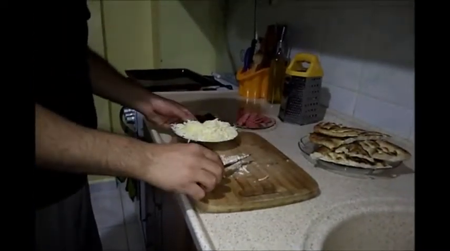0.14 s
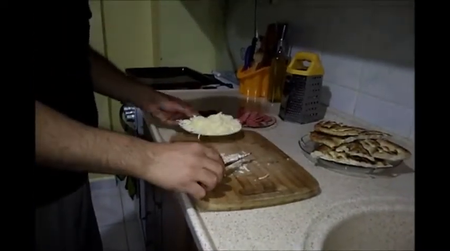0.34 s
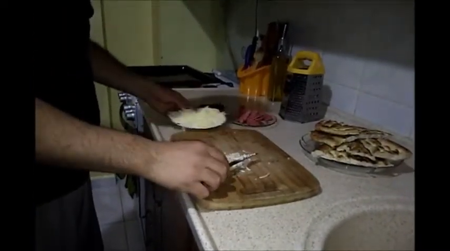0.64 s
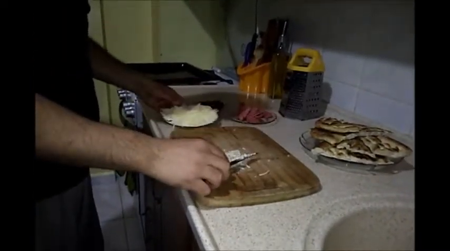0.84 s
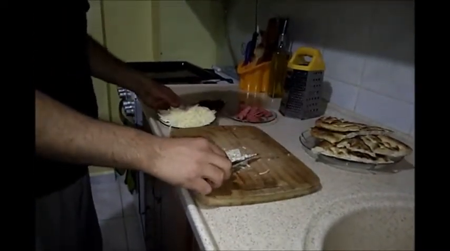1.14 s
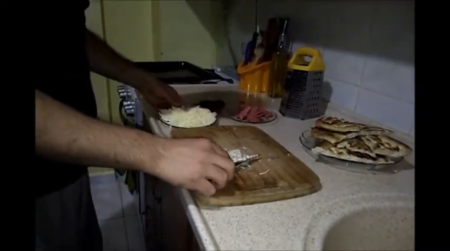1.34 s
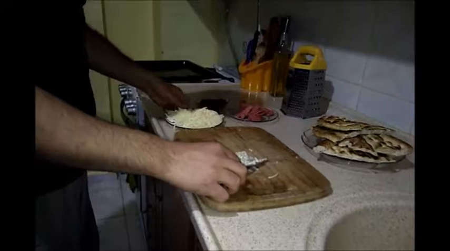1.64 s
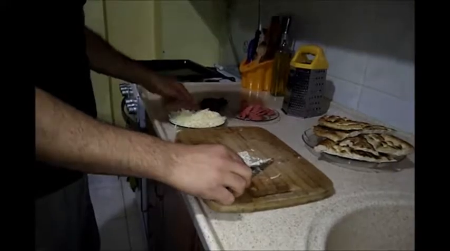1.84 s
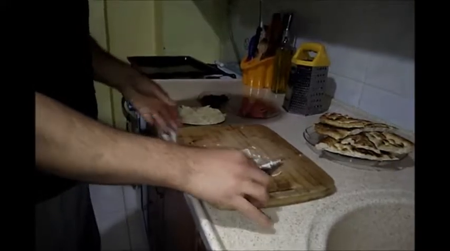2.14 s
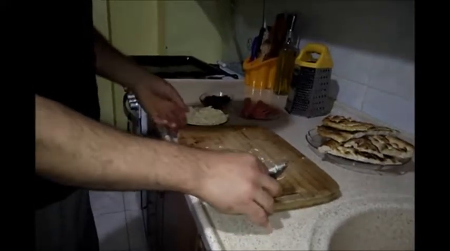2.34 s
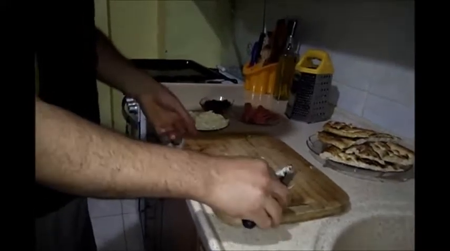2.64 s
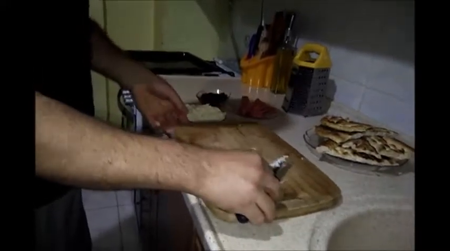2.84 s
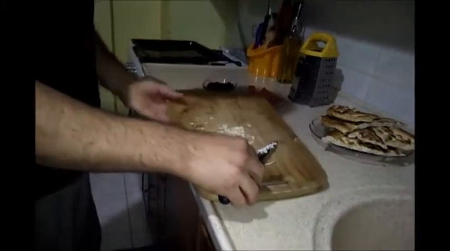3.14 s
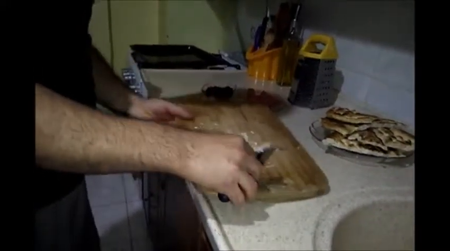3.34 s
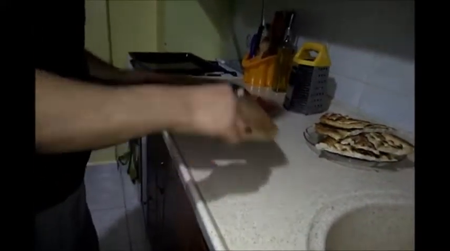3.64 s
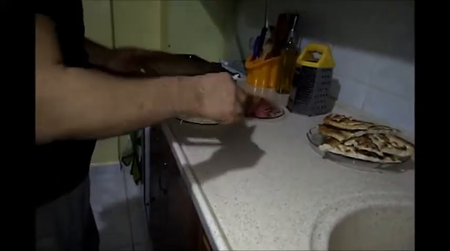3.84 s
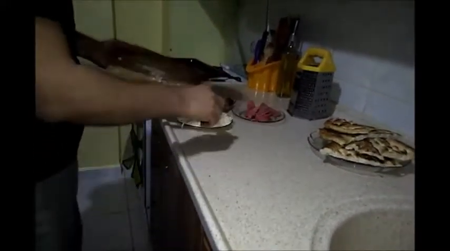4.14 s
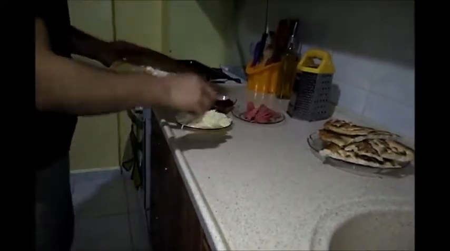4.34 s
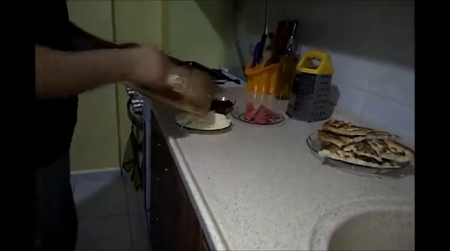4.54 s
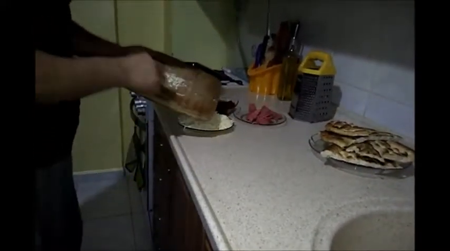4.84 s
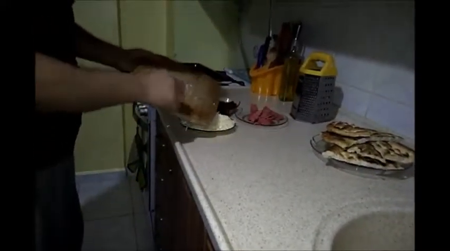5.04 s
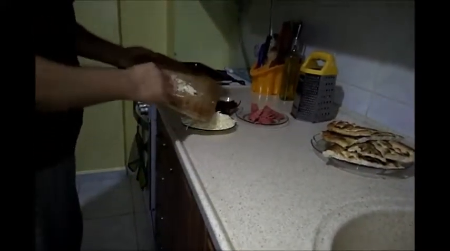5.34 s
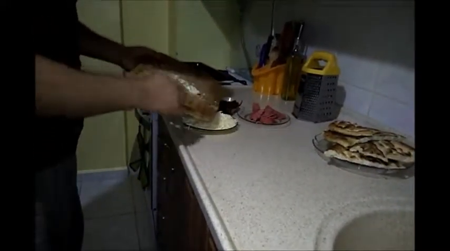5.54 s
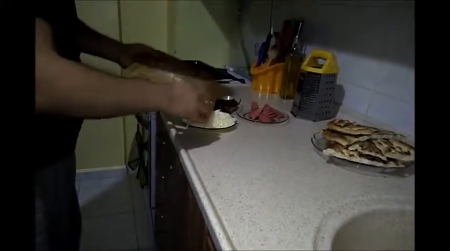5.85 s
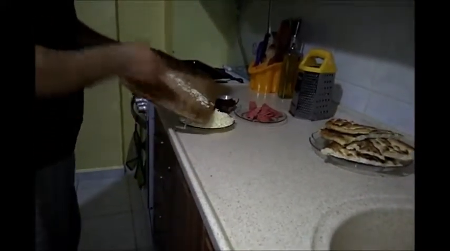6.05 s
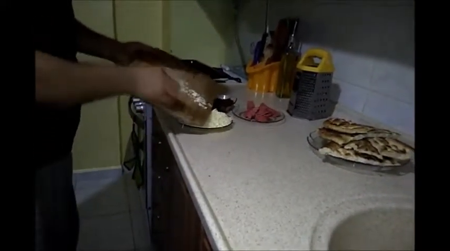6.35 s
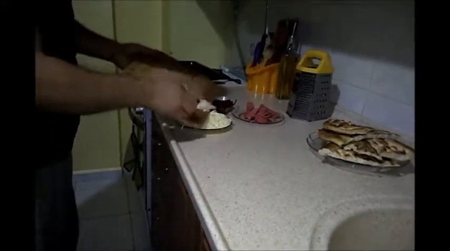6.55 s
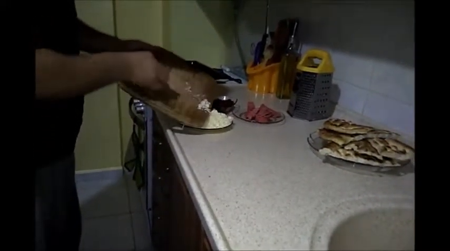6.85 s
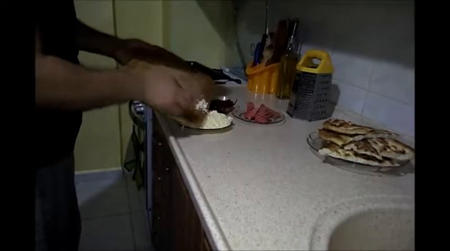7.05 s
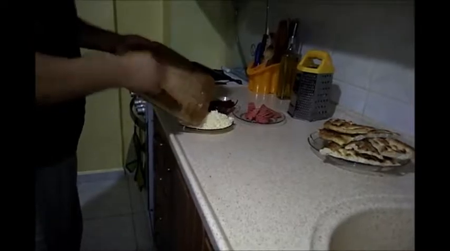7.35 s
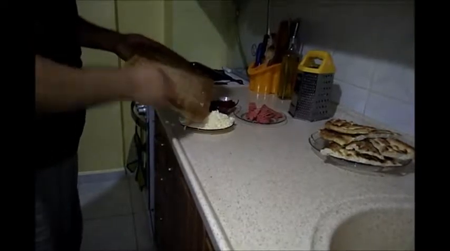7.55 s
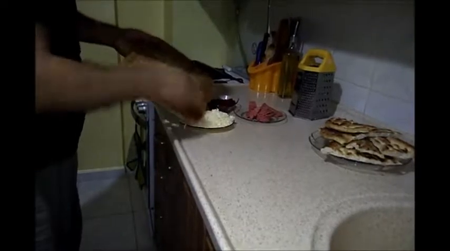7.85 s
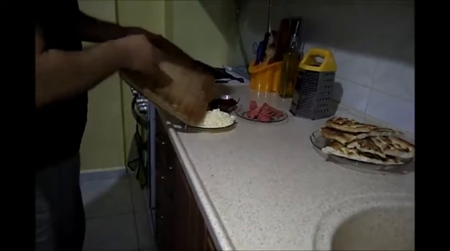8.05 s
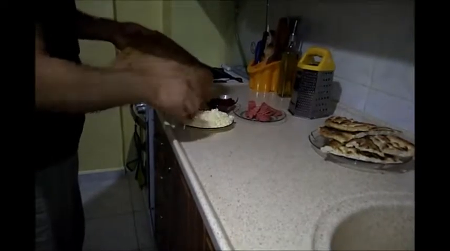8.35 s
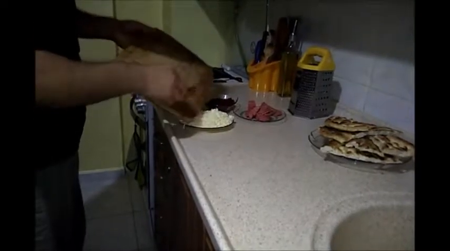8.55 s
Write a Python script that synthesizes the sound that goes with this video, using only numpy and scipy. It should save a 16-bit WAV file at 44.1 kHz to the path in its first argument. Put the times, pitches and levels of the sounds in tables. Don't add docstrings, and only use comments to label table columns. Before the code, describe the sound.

Dishes clink on a kitchen counter, a wooden board is slid and lifted, then a blade scrapes it in six rasping strokes and raps it.

```python
import sys
import numpy as np
from scipy import signal
from scipy.fft import rfft, irfft, next_fast_len
from scipy.io import wavfile
from scipy.ndimage import uniform_filter1d

SR = 44100
rng = np.random.default_rng(int(sys.argv[2]) if len(sys.argv) > 2 else 0)


def persist_wave(psi):
    counts = np.round(np.clip(psi, -1, 1) * 32767).astype(np.int16)
    wavfile.write(sys.argv[1], SR, np.atleast_2d(counts).T)


def ratio_of_db(decibels):
    return 10 ** (np.asarray(decibels, float) / 20)


N = 383792

# pitch_hz, level_db per hz
HISS_SPECTRUM = [(50, 5), (100, -0.5), (350, -1.5), (1000, -10), (3000, -9.5), (10050, -3.5),
                 (10400, -10.5), (11500, -32.5)]
# pitch_hz, likeness
HISS_LIKENESS = [(60, 0.21), (180, -0.061), (550, 0.36), (1650, 0.094), (4970, -0.28), (15000, -1.3)]
# pitch_hz, level_db
WHINE = [(5490, -79), (9335, -84), (9383, -68.5), (9432, -87)]
# peak_s, level_db, rise_s, fall_s, dull_part_db
RUSTLE = [(0.0, -62.5, .01, 0.56, -17), (.536, -64.5, 0.18, 0.52, 13), (1.336, -50, 0.0081, 0.065, -2),
          (1.55, -67, 0.063, 0.98, -1.5), (1.82, -68, 0.61, 0.041, 8.5), (2.36, -70, .01, 0.19, 2.5),
          (2.7, -66.5, 1.9, 0.73, -5.5), (3.284, -60, 0.46, 0.2, -16), (3.415, -48, 0.024, 0.18, -23),
          (3.49, -49, 0.15, 0.18, -18), (3.9, -65.5, 1.4, 0.83, -10), (4.53, -57.5, 0.15, 0.035, -5.5),
          (4.75, -70.5, 0.11, 0.27, -23), (5.363, -62.5, 0.29, 0.2, -12), (5.43, -55, .015, 0.024, 5.5),
          (6.25, -86, 0.11, .03, -31)]
# pitch_hz, level_db per hz
CLOTH = [(1500, -24.5), (2800, -5), (4400, -5), (7800, -2.5), (10500, -15.5), (13000, -18.5), (13800, -43)]
# peak_s, level_db, rise_s, fall_s
RUMBLE = [(.53, -59, 0.059, 0.42), (.85, -52.5, 0.083, 0.1), (1.14, -55, 0.14, 0.15), (1.7, -63, 1.3, 0.55),
          (1.87, -37.5, .03, 0.13), (2.3, -60, 0.34, .12), (2.83, -58, 0.42, 0.29),
          (3.05, -52, 0.026, 0.23), (3.22, -57, 0.17, 0.11), (3.75, -52, 0.075, 0.1),
          (5.47, -51, 0.13, 0.066), (5.84, -53, .08, .04), (5.94, -62, 0.057, 0.41), (8.29, -67, 0.28, .4),
          (8.62, -64, .08, .3)]
# pitch_hz, width_hz, level_db
CUPBOARD_MODES = [(70.0, 38, 0)]
# peak_s, level_db, rise_s, fall_s
DRAGS = [
    (.36, -61, 0.1, 0.2),
    (.51, -43, 0.15, 0.11),
    (.73, -52.5, 0.0059, 0.062),
    (1.17, -49.5, 0.066, 0.076),
    (1.6, -70.5, 1.3, 1.9),
    (1.83, -68, 0.031, 0.023),
    (3.05, -61, 0.046, 0.36),
    (3.41, -60, 0.019, 0.27),
    (4.53, -70, 0.077, 0.38),
]
# pitch_hz, level_db per hz
COUNTER = [(100, -8), (200, -16.5), (450, -5), (900, -18), (1450, -15.5), (2200, -24.5), (4000, -44),
           (6000, -95)]
# peak_s, level_db, rise_s, fall_s
CHAFE = [
    (.47, -52.5, 0.11, 0.14),
    (2.96, -67, 0.15, 0.13),
    (3.14, -66.5, 0.09, 0.18),
]
# pitch_hz, width_hz, level_db
CHAFE_MODES = [(870, 330, 0), (1367, 64, 10)]
# start_s, peak_db, brightness_db, depth_db
KNOCKS = [(0.516, -22.5, -5, -58), (0.611, -29, -4.5, -28), (0.728, -31.5, -9.5, -24.5),
          (3.03, -49.5, -2.5, -3), (3.108, -43.5, -11, -4), (3.214, -42, -25, -3), (3.338, -34, -17, -14),
          (3.344, -26, -18, -26), (3.355, -31, -15, -20), (3.548, -46.5, -37, 0), (3.74, -64, -18, 8),
          (3.762, -54.5, -18, 1), (5.475, -51, -18, -10), (5.817, -44, -15, -9), (5.938, -58.5, -27, 9)]
# pitch_hz, level_db, t60_s
WOOD = [(174, -4.5, 0.58), (349, -3, 0.3), (481.5, 2, 0.22), (600.5, 9.5, 0.32), (760, -60, 0.0099),
        (1080, -23, 0.025), (1776, -7, 0.16), (1880, -18, 0.036)]
# start_s, peak_db, ring_against_crack_db
CLINKS = [
    (0.836, -11.5, 0),
    (1.0695, -14, -0.5),
    (1.4207, -28, 5),
    (1.8383, -6.5, 6.5),
    (8.6065, -3.5, -1.5),
]
# pitch_hz, level_db per hz
CRACKS = [
    [(52, -54), (88, -13.5), (1670, -14.5), (3260, -7), (7870, -8), (9200, -24), (12900, -48), (15000, -70)],
    [(52, -46), (88, -18.5), (1320, -2), (5580, -9), (6080, -7), (8900, -16.5), (12400, -38), (15000, -95)],
    [(52, -36.5), (88, -1), (3120, -6), (4900, 0), (8760, -3.5), (12900, -21), (15000, -74)],
    [(35, -43.5), (90, -19), (650, -15.5), (1300, -12), (3500, -7.5), (7900, -15), (9000, -33),
     (12500, -55), (16000, -60)],
    [(35, -64), (150, -40), (1790, -7), (2470, -9.5), (3420, -1), (8230, -20.5), (12800, -35.5),
     (15000, -69.5)],
]
# pitch_hz, level_db, t60_s
GLASS = [(2155, 1, .16), (2206, 3, .16), (3055, -7, .12), (3522, 3, .17), (3640, -5, .1), (8100, -6, .12),
         (5240, 4, .16), (7477, 1, .14), (7593, 5, .15), (9930, -5, .09), (10200, -5, .08),
         (11500, -10, .11), (14000, -24, .035), (15430, 4, .04)]
# pitch_hz, level_db, t60_s
RAP = [(303, -20.5, 0.12), (575, 1, 0.18), (784, -22, 0.16), (1200, -5.5, 0.086), (1776, 10, 0.073),
       (2400, -4, .16), (3050, 2, .07), (3365, 9, 0.1), (4435, 5, .12), (4670, 2, 0.12), (4870, 8, .12),
       (5300, 2, .14), (6760, -2, 0.08), (7960, 6, 0.07)]
# pitch_hz, level_db, t60_s
RINGS = [
    [(448, -9, .1), (2830, -8, .06), (3194, -3, .08), (3324, 6, .16), (3958, -10, .08), (4680, -3, .08),
     (5175, 4, .12), (5500, -2, .08), (6690, 0, .09), (6960, -3, .08), (8600, 9, .08), (9980, -5, .07),
     (10700, -4, .07), (12500, -4, .08)],
    [(396, -13, .09), (1127, -1, .12), (2206, -3, .12), (1440, -4, .12), (4737, -4, .14), (5270, -4, .16),
     (6004, 9, .07), (6272, 5, .17), (7480, -5, .13), (8300, 4, .11), (9910, -9, .07), (12000, -14, .07)],
    [(3280, -14.5, 0.15), (3840, -13.5, 0.18), (5000, -3, .15), (6650, -5, .15), (8550, 4.5, 0.044)],
    GLASS,
    RAP,
]
# delay_s, level_db
BOUNCES = [
    [(.004, 1.5), (.009, -1.5), (.015, -3.5)],
    [(.004, 2), (.009, 0), (.016, 0)],
    [(.006, -3.5)],
    [(.003, 1), (.006, 3), (.0105, -1), (.031, -7)],
    [(.001, 1.5), (.005, 1), (.011, -2), (.015, -4)],
]
SPLITS = [.006, .004, .015, .004, .012]
# start_s, peak_db, brightness_db
LANDINGS = [
    (4.82, -43.5, 13),
    (5.82, -50.5, -10),
    (6.2775, -43, -14),
    (6.9164, -53, -10),
    (7.571, -40.5, -8),
    (7.621, -38.5, -2),
    (8.108, -38, -7),
]
# middle_s, level_db, half_length_s, pitch_hz, width_hz
CATCHES = [(4.87, -63, .07, 3000, 120), (4.88, -66.5, .08, 345, 73), (5.02, -60, .06, 2300, 120),
           (5.22, -61, .035, 1260, 30), (5.62, -63, .05, 460, 120), (5.69, -61, .06, 490, 150),
           (5.97, -66, .05, 590, 20), (5.64, -62, .06, 1700, 210), (5.91, -63.5, .04, 540, 30),
           (6.419, -51.5, 0.044, 600, 32), (6.49, -62, 0.028, 640, 30), (6.573, -59, 0.019, 580, 30),
           (5.065, -47.5, .02, 604, 88), (8.261, -57.5, 0.048, 640, 120), (6.355, -55.5, .03, 2600, 200),
           (6.385, -56.5, .05, 1950, 120), (6.58, -66.5, .05, 1900, 200), (7.05, -59.5, .08, 1800, 90),
           (7.05, -65, .08, 1290, 60.6), (7.64, -52, 0.033, 1700, 200), (7.72, -53.5, .05, 3100, 200),
           (7.76, -58, .04, 2350, 150), (7.78, -56.5, .06, 1750, 120), (8.23, -52, .04, 1270, 79.5),
           (8.27, -49.5, .04, 3240, 250), (8.3, -54, .04, 2970, 250), (8.3, -55, .03, 2100, 300),
           (7.2, -60, .07, 1860, 60), (7.12, -60, .08, 2320, 200), (3.1, -65, .12, 2700, 1200),
           (3.355, -46, 0.015, 600, 200), (1.6, -66, 0.08, 200, 80), (1.1, -52.5, .06, 170, 60)]
# start_s, peak_db, centre_hz, t60_s
TICKS = [(1.3286, -38.5, 7200, 0.021), (1.834, -33, 2500, 0.051), (2.3545, -39, 7100, 0.024),
         (3.216, -45, 6000, 0.031), (4.6324, -39, 6200, 0.019), (4.8198, -39, 2400, 0.072),
         (5.4215, -46, 5400, 0.037), (5.454, -42, 5630, 0.02), (5.439, -50, 1200, 0.037),
         (5.484, -56, 1380, 0.016), (5.8197, -39, 7460, 0.025), (6.1784, -44, 7920, 0.018),
         (6.215, -40.5, 8860, 0.014), (6.233, -45.5, 8620, 0.018), (6.2775, -31, 5950, 0.04),
         (6.7516, -45, 2380, 0.015), (6.769, -51, 4400, 0.029), (6.9176, -46, 2670, 0.034),
         (7.571, -40.5, 4610, 0.035), (8.1084, -39.5, 2360, 0.057)]
# start_s, peak_db, pitch_hz, t60_s
BUMPS = [(3.04, -46, 60.7, .12), (3.116, -49, 91, 0.068), (3.17, -43, 58.7, 0.53), (3.207, -44.5, 59, 0.44),
         (3.24, -46, 58.4, 0.21), (3.061, -43, 60, 0.12), (3.692, -57, 70, 0.058),
         (3.741, -46.5, 85, 0.056), (3.762, -47.5, 75, 0.14), (5.377, -53.5, 60, .12),
         (5.419, -54, 75, 0.07), (5.463, -50, 70, .14), (5.818, -39.5, 132, 0.027), (5.845, -50, 60, .08),
         (5.936, -53, 75, 0.1), (6.031, -52.5, 61.6, 0.098), (6.1, -58, 60, 0.097)]
# time_s, speed_db
SPEED = [
    [(4.815, -65), (4.899, -51), (5.185, -52.5), (5.235, -75), (5.33, -76)],
    [(5.53, -72), (5.612, -57.5), (5.834, -72.5), (5.86, -85)],
    [(6.272, -53), (6.285, -55.5), (6.428, -57), (6.602, -62.5), (6.652, -92)],
    [(6.912, -64), (6.962, -50), (7.098, -50.5), (7.25, -69.5), (7.3, -82)],
    [(7.567, -56), (7.621, -54.5), (7.693, -46), (7.789, -46.5), (7.9, -86)],
    [(8.106, -59), (8.188, -51.5), (8.22, -44), (8.316, -43.5), (8.45, -74)],
]
# lift_s, low_modes_db, landing_db, mid_against_hiss_db, high_against_hiss_db
PRESS = [
    (5.17, -42, -14.5, -7, -4.5),
    (5.77, -53, -13, 1, 3),
    (6.55, -42, 0, -28.5, -3),
    (7.15, -46.5, 0, -18, -3),
    (7.76, -49, -4, -10, -2),
    (8.33, -50, -3, -24, -7.5),
]
# pitch_hz, level_db per hz
EDGE = [(150, -22), (400, -2.5), (2000, -7), (3000, 7.5), (4500, 3), (8900, 2.5), (12500, -13.5),
        (14000, -50)]
# pitch_hz, width_hz, level_db
BOARD_LOW = [(551.2, 27.7, -1.5), (575, 27, 4), (635, 48, -6.5), (517.5, 9.3, -14.5), (776, 52, -16.5),
             (370, 30, -26)]
# pitch_hz, width_hz, level_db
BOARD_MID = [(1254, 39, -8), (1285, 71, -12), (1103, 68, -23.5)]
# pitch_hz, width_hz, level_db
BOARD_HIGH = [(1646, 87, 6), (1805, 56, 12), (2035, 63, 3.5), (2460, 42, 7.5), (2670, 86, -2.5),
              (2920, 110, 20), (3490, 50, -4)]
# pitch_hz, t60_s
ROOM = [(100, 0.65), (500, .36), (2000, 0.3), (5000, 0.33), (10000, 0.26), (15000, 0.085)]
# pitch_hz, likeness
ROOM_LIKENESS = [(100, 0.8), (700, 0.75), (2000, 0.18), (10000, 0.51)]
# pitch_hz, left_minus_right_db
PORT_DB = [(60, -2.5), (180, -4), (550, -0.5), (1650, 1), (4970, -9), (15000, -3.5)]
# pitch_hz, level_db
MIC = [(30, -18.5), (80, -1.5), (9000, -2), (12000, 3.5), (14000, -1.5), (16000, -15.5)]


def evened(x):
    return x / np.sqrt(np.mean(x ** 2) + 1e-20)


def read(points, hz):
    f, value = np.transpose(points)
    return np.interp(np.log(hz + 1), np.log(f + 1), value)


def add(mix, s, sound):
    part = mix[round(s * SR):][:len(sound)]
    part += sound[:len(part)]


def colour(x, points):
    size = next_fast_len(x.shape[-1], real=True)
    gain = ratio_of_db(read(points, np.fft.rfftfreq(size, 1 / SR)))
    return irfft(rfft(x, size) * gain, size)[..., :x.shape[-1]]


def swells(rows):
    t = np.arange(0, N, 16) / SR
    power = 0
    for s, db, rise, fall in rows:
        away = np.maximum((s - t) / rise, (t - s) / fall)
        power = power + ratio_of_db(db - 20 * away) ** 2
    return np.interp(np.arange(N) / SR, t, np.sqrt(power))


def grit(per_s, spread_db, smooth):
    slips = (rng.random(N) < per_s / SR) * ratio_of_db(spread_db * np.minimum(rng.exponential(1, N), 4))
    return (smooth + evened(slips)) * rng.standard_normal(N)


def resonate(x, peaks, wander_db=0.):
    out, steps = 0, np.arange(0, N, SR // 22)
    for k, (hz, width, db) in enumerate(peaks):
        r = np.exp(-np.pi * width / SR)
        mode = signal.lfilter([1, 0, -r], [1, -2 * r * np.cos(2 * np.pi * hz / SR), r * r], x)
        swell = np.interp(np.arange(N), steps, ratio_of_db(db + wander_db * rng.standard_normal(len(steps))))
        out = out + (-1) ** k * (1 - r) * swell * mode
    return evened(out)


def ringing(modes, longest_s, tilt_db=0., split=0.028, count=4, scatter=0.93):
    t, x = np.arange(SR // 4) / SR, 0
    for hz, db, t60 in modes:
        fade = ratio_of_db(db + tilt_db * (hz > 1000) - 60 * t / min(t60, longest_s))
        jitter, phase = rng.uniform(-0.97, 1, (2, count, 1))
        detune = np.linspace(-1, 1, count)[:, None] + jitter / count
        cluster = np.sin(2 * np.pi * (hz * (1 + split * detune) * t + scatter * phase))
        x = x + fade * cluster.sum(0)
    return x / abs(x).max()


def burst(points, t60, rise_s):
    t = np.arange(SR // 4) / SR
    noise = evened(colour(rng.standard_normal(len(t)), points))
    return noise * ratio_of_db(-60 * t / t60) * np.minimum(t / rise_s, 1)


def sagging(hz):
    return np.sin(2 * np.pi * np.cumsum(hz) / SR)


def pair(same, frames, size):
    a, b, c, d = rng.standard_normal((frames, size // 2 + 1, 4)).T
    like = np.clip(read(same, np.fft.rfftfreq(size, 1 / SR)), -1, 1)[:, None]
    left, other = a + 1j * b, c + 1j * d
    return np.array([left, like * left + np.sqrt(1 - like ** 2) * other])


def floor():
    z = pair(HISS_LIKENESS, N // 256 + 5, size=1024)
    noise = signal.istft(z, nperseg=1024, noverlap=768)[1][:, :N]
    hush = ratio_of_db(-62) * evened(colour(noise, HISS_SPECTRUM))
    t = np.arange(N) / SR
    whine = sum(np.sqrt(2) * ratio_of_db(db) * np.sin(2 * np.pi * hz * t) for hz, db in WHINE)
    return hush + whine * ratio_of_db([[0.3], [-0.3]])


def rustle():
    fizz = swells([row[:-1] for row in RUSTLE])
    dull = swells([(s, db + dull_db, rise, fall) for s, db, rise, fall, dull_db in RUSTLE])
    rub = grit(4000, 1.2, smooth=1.0)
    low = colour(rub, [(300, -12.5), (600, -3.0), (1400, -5.5), (2200, -7.5), (3500, -37.5)])
    return fizz * evened(colour(rub, CLOTH)) + ratio_of_db(-7.0) * dull * evened(low)


def rumble():
    push = rng.standard_normal(N) + 0.62 * rng.standard_normal((2, N))
    shake = colour(push, [(25, -13.0), (45, -0.5), (130, -10.5), (250, -20.5)])
    level = np.hypot(swells(RUMBLE), ratio_of_db(-72))
    return level * resonate(shake, CUPBOARD_MODES) * ratio_of_db([[-1.2], [1.2]])


def drags():
    stutter = grit(800, 3, smooth=.7)
    slide = swells(DRAGS) * evened(colour(stutter, COUNTER))
    return slide + swells(CHAFE) * resonate(stutter, CHAFE_MODES)


def knocks():
    out, t = np.zeros(N), np.arange(SR // 5) / SR
    for s, db, bright_db, deep_db in KNOCKS:
        spot = [(hz * rng.uniform(.93, 0.97), level, t60) for hz, level, t60 in WOOD]
        slap = [(150, 0.3 * deep_db), (500, -6.5), (1200, bright_db + 7.0), (3000, bright_db - 7), (4500, -44.5)]
        thud = sagging(75 + 160 * np.exp(-t / 0.022))
        add(out, s, ratio_of_db(db + deep_db - 60 * t / 0.04) * thud)
        add(out, s, ratio_of_db(db - 12.5) * ringing(spot, 0.21, bright_db + 9))
        add(out, s, ratio_of_db(db - 4.0) * burst(slap, t60=0.041, rise_s=0.0012))
    return out


def clinks():
    cracks, rings = np.zeros((2, N))
    for (s, db, ring_db), crack, modes, bounces, split in zip(CLINKS, CRACKS, RINGS, BOUNCES, SPLITS):
        lasting = [(hz, level, 1.7 * t60) for hz, level, t60 in modes]
        for k, (delay, again_db) in enumerate([(0.0018, 0.00075)] + bounces):
            hit = burst(crack, t60=0.035, rise_s=0.002)
            add(cracks, s + delay - .001, ratio_of_db(db + again_db - 8.5) * hit)
            ring = ringing(lasting, .3, split=split, count=4, scatter=.15)
            bounce_db = -8 if k else 0
            add(rings, s + delay, ratio_of_db(db + again_db - 4 + ring_db + bounce_db) * ring)
    return cracks, rings


def catches():
    out = np.zeros(N)
    for s, db, bright_db in LANDINGS:
        strike = ringing(RAP, 0.25, bright_db - 10, split=0.032, count=3, scatter=0.25)
        add(out, s, ratio_of_db(db) * strike)
    for s, db, half, hz, width in CATCHES:
        t = np.arange(-2 * half, 2 * half, 1 / SR)
        r = np.exp(-np.pi * width / SR)
        poles = [1, -2 * r * np.cos(2 * np.pi * hz / SR), r * r]
        sing = signal.lfilter([1, 0, -1], poles, rng.standard_normal(SR // 2))[2000:][:len(t)]
        add(out, s - 2 * half, ratio_of_db(db - 9.8 * (t[:len(sing)] / half) ** 2) * evened(sing))
    return out


def ticks():
    out = np.zeros(N)
    for s, db, hz, t60 in TICKS:
        click = [(hz / 8, -18), (hz / 2.9, -6), (hz, 0), (hz * 1.42, -6), (13000, -30), (15000, -60)]
        add(out, s, ratio_of_db(db - 1.5) * burst(click, t60, rise_s=0.00057))
    return out


def bumps():
    out, t = np.zeros(N), np.arange(SR // 3) / SR
    for s, db, hz, t60 in BUMPS:
        swing = sagging(hz * (1 + 0.72 * np.exp(-t / 0.0072)))
        add(out, s, ratio_of_db(db - 60 * t / t60) * swing)
    return out


def blade_speed():
    out = np.zeros((len(SPEED), N))
    for track, rows in zip(out, SPEED):
        s, db = np.transpose(rows)
        t = np.arange(s[0], s[-1], 1 / SR)
        edge = np.clip(np.minimum((t - s[0]) / .003, (s[-1] - t) / .03), 0, 1)
        add(track, s[0], edge * ratio_of_db(np.interp(t, s, db)))
    return out


def pressure():
    out, t = np.zeros(N), np.arange(SR) / SR
    for ((start, _), *_), (lift, db, land_db, *_) in zip(SPEED, PRESS):
        landing = land_db * np.maximum(1 - t / 0.12, 0)
        lifting = 173 * np.maximum(t + start - lift, 0)
        add(out, start, np.minimum(t / 0.016, 1) * ratio_of_db(db + landing - lifting))
    return out


def patchy(x):
    z = signal.stft(x, nperseg=512)[2]
    field = uniform_filter1d(rng.standard_normal(z.shape), size=5, axis=0)
    field = uniform_filter1d(field, size=7, axis=1)
    return signal.istft(z * ratio_of_db(2.5 * evened(field)), nperseg=512)[1][:N]


def strokes():
    speed, low = blade_speed(), pressure()
    hiss = speed.sum(0)
    mid, high = ratio_of_db(np.transpose(PRESS)[-2:]) @ speed
    even = grit(1500, 2.3, smooth=0.84)
    slips = patchy(even)
    wide = colour(slips, [(250, -11.5), (700, -3.0), (1500, -7.5), (2600, 1.5), (3500, -72), (5000, -62)])
    wide = evened(wide)
    hum = resonate(even, BOARD_LOW, wander_db=3.2)
    hum = colour(hum, [(200, -20), (330, -1), (800, -1), (1100, -25)])
    knock = resonate(slips, BOARD_MID, wander_db=3.)
    knock = colour(knock, [(600, -25), (950, -3), (1400, -2), (2000, -20)])
    rasp = resonate(wide, BOARD_HIGH, wander_db=3.5) + .35 * wide
    ring = ratio_of_db(-5.5) * low * evened(hum)
    ring = ring + ratio_of_db(-2.5) * mid * evened(knock) + ratio_of_db(-2.0) * high * evened(rasp)
    return ratio_of_db(-0.13) * hiss * evened(colour(slips, EDGE)) + ring


def room(x):
    hz, t = np.fft.rfftfreq(256, 1 / SR), np.arange(SR // 160) * 64 / SR
    z = pair(ROOM_LIKENESS, len(t), size=256) * ratio_of_db(-60 * t / read(ROOM, hz)[:, None])
    tail = signal.istft(z, nperseg=256, noverlap=192)[1]
    tail = np.pad(tail, ((0, 0), (200, 0)))
    bins = rfft(tail)
    flat = bins / np.sqrt(uniform_filter1d(abs(bins) ** 2, size=14, axis=1))
    tail = irfft(flat)[:, :-2000]
    tail = tail / np.linalg.norm(tail, axis=1)[:, None]
    return signal.fftconvolve(x[None], tail, axes=1)[:, :N]


def ports(x, lag_s):
    size = next_fast_len(N, real=True)
    hz = np.fft.rfftfreq(size, 1 / SR)
    half = ratio_of_db(read(PORT_DB, hz) / 2) * np.exp(1j * np.pi * hz * lag_s)
    return irfft(rfft(x, size) * np.array([half, 1 / half]), size)[:, :N]


def scene():
    rubs = rustle() + drags() + strokes() + catches()
    near = knocks() + ticks()
    cracks, rings = clinks()
    send = ratio_of_db(1.0) * rubs + ratio_of_db(-3) * near + ratio_of_db(-1.5) * cracks + ratio_of_db(-7) * rings
    wet = room(send) * ratio_of_db([[-1.2], [1.2]])
    direct = ports(ratio_of_db(0.5) * rubs + near + cracks + ratio_of_db(2.5) * bumps(), lag_s=0.00013)
    return direct + ports(rings, lag_s=0.00006) + wet + floor() + rumble()


def low_pass(x):
    return signal.sosfilt(signal.butter(12, 16170, fs=SR, output="sos"), x)


def record(dry):
    mix = colour(dry, MIC)
    return low_pass(mix)


dry = scene()
out = record(dry)
persist_wave(out)
```